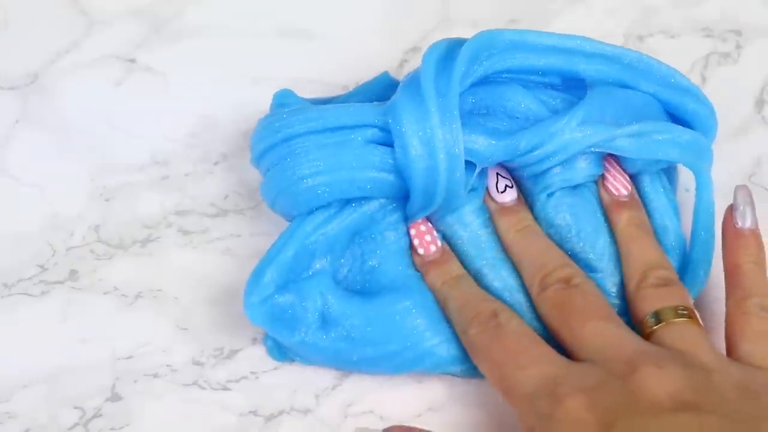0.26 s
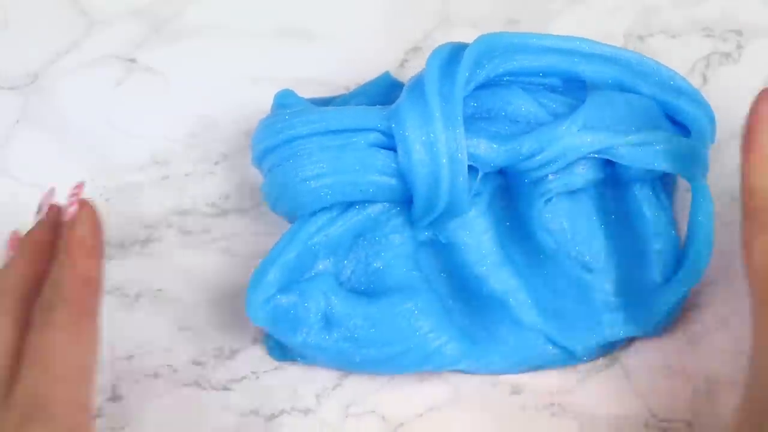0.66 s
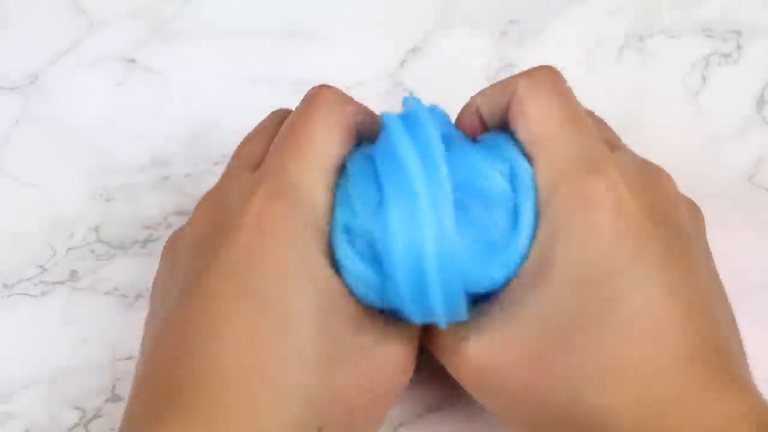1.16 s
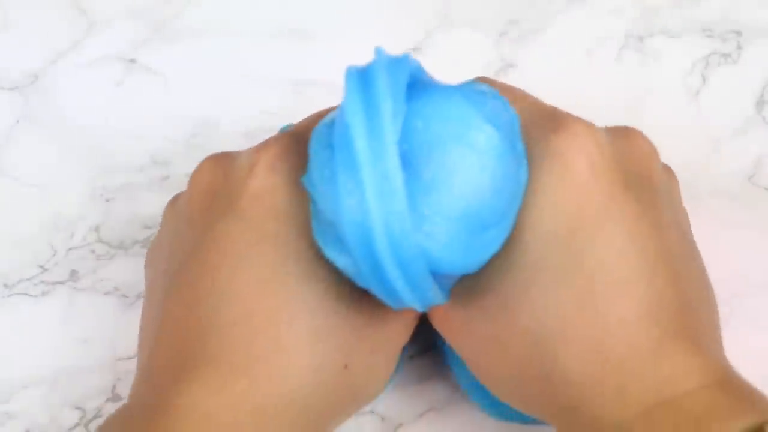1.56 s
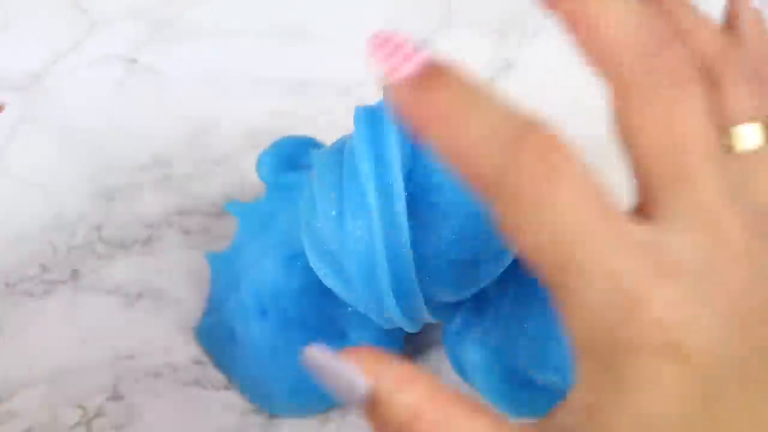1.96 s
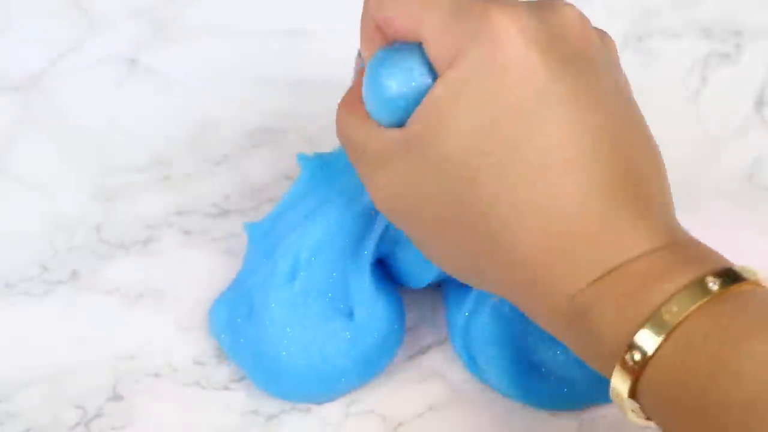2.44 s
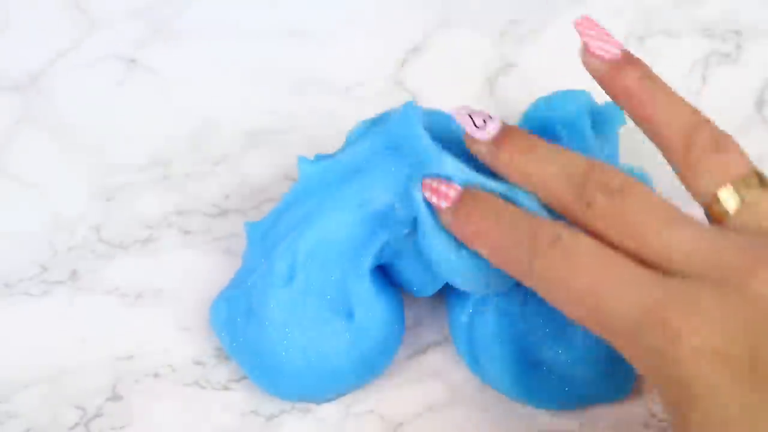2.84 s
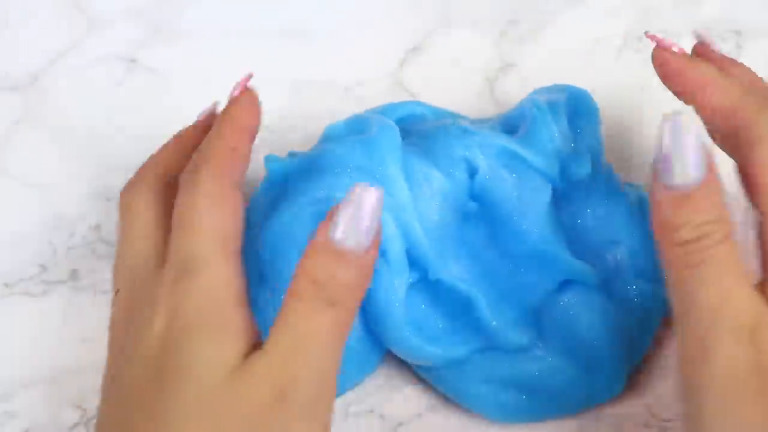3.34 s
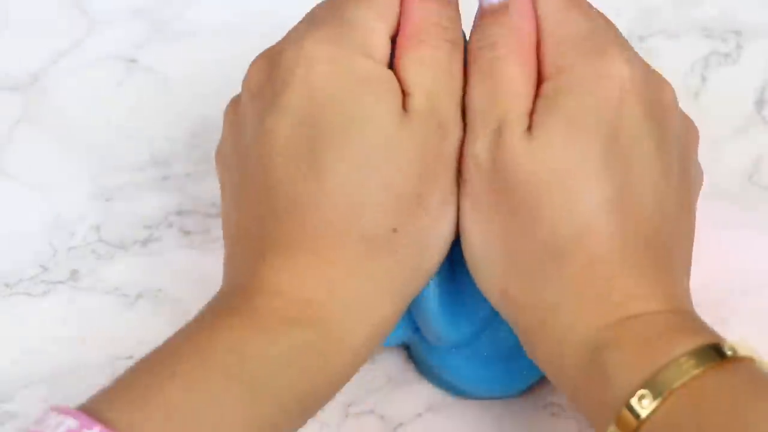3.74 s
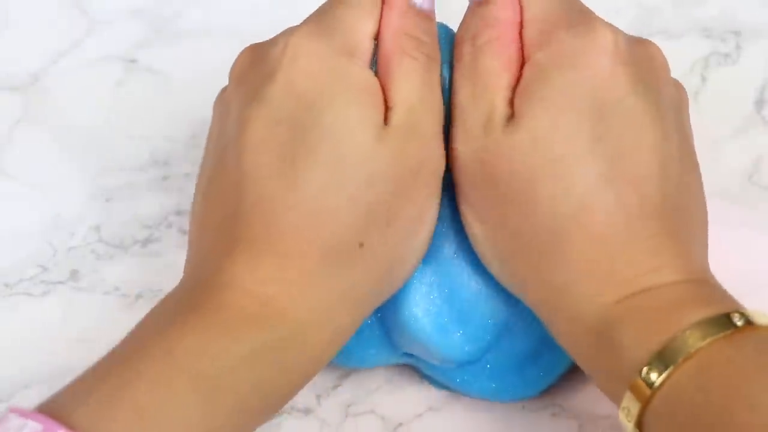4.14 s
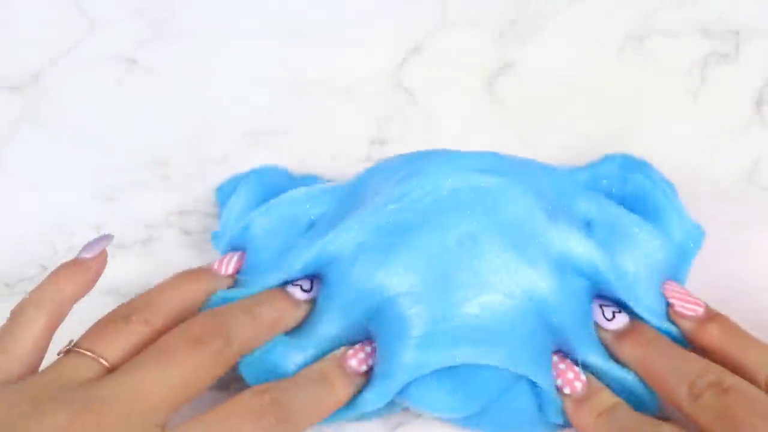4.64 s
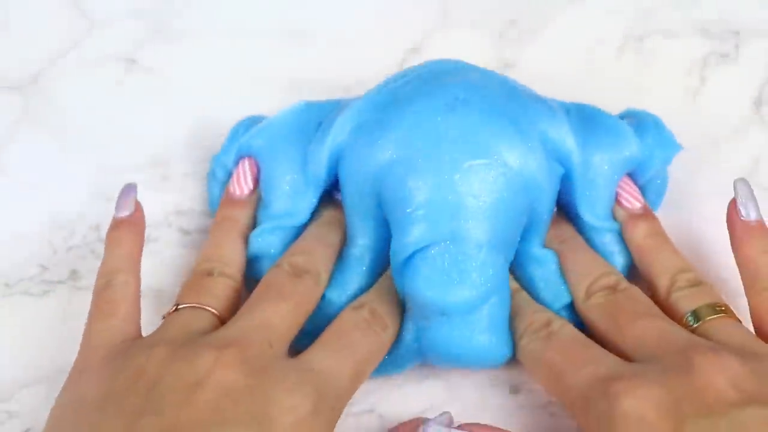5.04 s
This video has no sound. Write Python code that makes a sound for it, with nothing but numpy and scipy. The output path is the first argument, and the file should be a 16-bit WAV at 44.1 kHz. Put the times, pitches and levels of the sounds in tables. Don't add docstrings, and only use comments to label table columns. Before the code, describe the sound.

Trapped air in thick slime bursts as hard, bright snaps and hollow lower gulps, over sticky peeling crackle, short gurgles and faint squeaky whistles. Activity peaks between one and two seconds and again just before four, with quiet gaps between. Soft low booms come from the table under the hands. Heard very close and centred in a small, lightly reverberant room with low hiss; faint camera motor ticks close it.

```python
import sys
import numpy as np
from scipy import signal
from scipy.fft import rfft, irfft, next_fast_len
from scipy.io import wavfile
from scipy.ndimage import uniform_filter1d, map_coordinates

SR = 44100
rng = np.random.default_rng(int(sys.argv[2]) if len(sys.argv) > 2 else 0)


def level_to_linear(level):
    exponent = np.asarray(level, float) / 20
    return 10 ** exponent


def digitize_waveform(pressure):
    field = np.atleast_2d(pressure).T
    bounded = np.clip(field, -1, 1)
    quanta = np.round(bounded * 32767).astype(np.int16)
    wavfile.write(sys.argv[1], SR, quanta)


N = 233597

TOP_HZ, QUIET_TOP_HZ = 16700, 15900

# pitch_hz, density_db [dB per Hz]
HISS_SPECTRUM = [(15, -27), (25, -15.5), (80, 2), (226, -12), (634, -13), (746, -16), (1390, -16.5),
                 (1730, -24), (3600, -28.5), (4020, -22), (5570, -29), (15200, -24.5), (16500, -36)]
HISS_DB = -65.5
# pitch_hz, level_db
GRIT_SPECTRUM = [(100, -44), (1000, -43), (2500, -34), (6000, -30), (15000, -27)]

# pitch_hz, width_hz, level_db
LENS_BARREL = [(1580, 450, -2), (2600, 490, 0.5), (3550, 240, 4.5)]
FRAME_S, LENS_LAST_S, LENS_STEPS = 1 / 29.97, 5.2715, 14

# delay_s, level_db
ECHOES = [
    (0.0104, -13.5),
    (0.012, -22.5),
    (.0145, -26),
]
# pitch_hz, t60_s
ROOM_DECAY = [(500, 0.36), (6000, 0.26), (14000, 0.23)]

# pitch_hz, width_hz, level_db
TABLE_MODES = [(130.4, 67.7, -4.5), (162, 53, -0.5), (228.3, 14, -4.5), (294.4, 15, -5.5)]
# start_s, level_db, pitch_hz, decay_cycles [to 1/e]
KNOCKS = [
    (.468, -21.5, 143.3, 3.7),
    (2.814, -41, 151, 3.2),
    (3.413, -29.5, 161, 1.3),
    (4.003, -31, 130, 0.51),
]
# peak_s, boom_db, length_s, rumble_db [re boom]
PUSHES = [(0.451, -36, 0.061, -16), (0.853, -49, 0.017, -6), (0.99, -39.5, 0.0066, -14.5),
          (1.072, -38.5, 0.053, -22), (1.328, -47.5, 0.0093, -19.5), (1.467, -55, 0.057, -25),
          (1.769, -37.5, 0.077, -11.5), (2.296, -66, 0.041, 0), (2.713, -47, 0.025, -7),
          (2.82, -59.5, 0.071, 1), (3.245, -42, 0.047, -14), (3.435, -53.5, 0.03, 6.5),
          (3.537, -49.5, 0.064, -14), (3.66, -53, 0.034, -14), (3.792, -64, 0.094, -1),
          (4.284, -49.5, 0.15, -7), (4.654, -81, 0.045, -6), (4.888, -65, 0.087, -16)]
PUSH_RISE, PUSH_SAG_DB = 1500, 4.5
BOOM_FALL, RUMBLE_FALL = 190, 110
BOOM_REST_DB, RUMBLE_REST_DB = -64, -81.5

# start_s, end_s, start_hz, end_hz, level_db
GURGLES = [(2.694, 2.712, 656, 757, -41.5), (2.716, 2.74, 640, 817, -38.5),
           (2.738, 2.768, 1250, 900, -40.5), (2.745, 2.77, 600, 670, -44.5),
           (2.705, 2.73, 4000, 3300, -37.5), (2.712, 2.73, 3700, 2350, -51),
           (2.785, 2.835, 3800, 3800, -45.5), (2.85, 2.866, 850, 820, -48), (4.243, 4.265, 370, 260, -42.5),
           (4.266, 4.279, 4000, 2800, -42), (4.279, 4.292, 4400, 2800, -41.5),
           (4.288, 4.31, 632, 900, -44.5), (4.305, 4.32, 1700, 1600, -44), (4.335, 4.36, 1100, 1700, -43),
           (4.362, 4.386, 1000, 1000, -45), (4.39, 4.41, 980, 540, -48), (4.414, 4.432, 820, 770, -53),
           (4.33, 4.445, 270, 330, -51.5), (1.3, 1.318, 1800, 1400, -38), (1.325, 1.36, 1500, 1600, -40.5),
           (3.8012, 3.8055, 1350, 1100, -20.5), (3.811, 3.82, 1500, 1400, -29),
           (3.824, 3.831, 1400, 1600, -33), (1.757, 1.778, 3300, 3600, -31),
           (1.788, 1.817, 3000, 2900, -31), (1.762, 1.785, 2000, 1500, -31), (1.838, 1.858, 650, 600, -35),
           (1.71, 1.732, 1300, 1200, -45), (3.7935, 3.799, 3800, 3400, -31), (3.225, 3.28, 500, 450, -45),
           (.912, .925, 2300, 1900, -46.5), (.85, .862, 1900, 1400, -47.5), (1.04, 1.075, 510, 700, -49),
           (.44, .5, 450, 580, -40.5)]
# start_s, end_s, start_hz, end_hz, level_db
WHISTLES = [(1.863, 1.883, 8700, 5900, -39), (1.877, 1.89, 5700, 4980, -47),
            (2.272, 2.288, 2510, 2500, -58), (2.288, 2.3, 2550, 2480, -54), (2.304, 2.322, 2500, 2450, -60),
            (2.324, 2.33, 2720, 2600, -54), (2.3336, 2.3348, 3400, 3070, -14.5),
            (.945, 0.973, 4760, 4470, -50), (2.8684, 2.873, 4000, 3910, -27),
            (2.867, 2.873, 3350, 3450, -34), (2.856, 2.872, 3760, 3950, -40),
            (2.875, 2.885, 4000, 4640, -38.5), (2.888, 2.9, 4500, 4700, -47),
            (3.181, 3.207, 2900, 2960, -60)]

# peak_s, crackle_db, length_s, squelch_db [re crackle], fizz_db [re crackle]
PEELS = [(0.449, -31.5, .015, -4.5, 1), (0.442, -50, .006, 10, -7), (0.463, -27.5, 0.015, -7, -6.5),
         (0.481, -43, 0.013, 3.5, -1), (1.05, -42, 0.03, 1, -6.5), (1.072, -41.5, 0.1, 0, -12.5),
         (1.212, -48, 0.015, -2.5, -10.5), (1.7342, -34, 0.014, 2.5, 0.5), (1.757, -28, 0.083, -3.5, -9.5),
         (1.854, -46, .04, -16, -4), (2.254, -53, 0.015, -3, -0.5), (2.265, -59, 0.06, 3, -8.5),
         (2.699, -42.5, 0.077, -4, 1), (2.774, -47, 0.08, -9, -1), (2.862, -41, 0.015, 1, -7),
         (3.182, -54.5, 0.045, -13, -1.5), (3.222, -44.5, 0.0066, -4.5, 0.5), (3.235, -39.5, .016, -1, 0),
         (3.252, -36.5, .007, -5, 0), (3.263, -40, 0.0089, -0.5, -3), (3.299, -49.5, .006, -4.5, -6),
         (3.806, -53.5, 0.16, -9, 6), (4.028, -53.5, 0.039, -1.5, 13.5), (4.22, -60, .025, 1, 3.5),
         (4.244, -47.5, 0.026, -6.5, 1.5), (4.269, -38.5, 0.042, -4.5, -2), (4.323, -44, 0.094, -3.5, -1),
         (4.438, -59.5, 0.02, -8, 4.5), (4.466, -51, 0.0073, -2.5, 0)]
PEEL_RISE, PEEL_SAG_DB, PEEL_FALL = 2300, 5.5, 740
CREEP_DB, CREEP_RISE = -7.5, 760
# time_s, effort_db
KNEADING = [(0, -82.5), (.72, -69), (.83, -54.5), (.95, -48.5), (1.19, -58), (1.31, -53.5), (1.5, -62),
            (1.66, -74), (2.2, -76), (2.4, -60), (2.6, -73), (3.1, -72.5), (3.47, -56), (4.0, -60),
            (4.2, -69), (4.47, -61.5), (4.91, -62.5), (5.03, -75.5)]
KNEAD_SQUELCH_DB, KNEAD_FIZZ_DB = -6, -2
# pitch_hz, density_db [dB per Hz]
FIZZ_SPECTRUM = [(2650, -22.5), (4500, -1.5), (7880, 0), (9480, -2), (13900, -5), (16000, -9), (16200, -17),
                 (16500, -45)]

# start_s, blast_db, centre_hz, blast_s, hiss_db [re blast], hiss_s
JETS = [
    (4.0015, 0.5, 10400, 0.00072, -28.5, 0.032),
    (3.8384, -19.5, 5100, 0.00083, -18.5, 0.012),
]

# pitch_hz, width_hz
PORT = (3720, 1580)
# start_s, snap_db, ring_hz, spit_db [re snap]
SNAPS = [(0.0514, -39.5, 2750, 2), (.729, -17.5, 3540, -4.5), (0.732, -22, 2920, -8.5),
         (.765, -16.5, 3400, -4), (0.7673, -17, 4330, -13.5), (.91, -33, 2350, -6.5),
         (1.0787, -22, 3000, -8), (1.121, -4.5, 3700, 3.5), (1.2688, -3, 3293, 0.5),
         (1.4173, -24.5, 3670, 3), (1.428, -30.5, 2700, 3), (1.4598, -13.5, 3800, 2.5),
         (1.5077, -32.5, 2460, -1.5), (1.7614, -25, 3300, -4), (1.813, -31, 3080, -7),
         (1.8276, -17, 3350, 6), (2.3337, -14, 3527, -3.5), (2.3372, -27, 3620, 1),
         (2.3479, -29.5, 4400, 2.5), (2.3609, -35, 4600, 1.5), (2.717, -27, 3730, -5),
         (2.8525, -27, 3900, -9), (2.8596, -31, 3840, -3), (2.8682, -27, 4200, -7),
         (2.8806, -32.5, 3800, -2), (3.6513, -30, 3514, -2.5), (3.7249, -25.5, 2220, 4.5),
         (3.77, -16, 3250, -9.5), (3.792, -5, 3330, -10), (3.7998, -9, 3440, -1.5),
         (3.802, -15.5, 3830, 1.5), (3.8102, -20, 3700, 0.5), (3.838, -7.5, 3450, 12),
         (3.9291, -12.5, 3100, -0.5), (4.0288, -31, 3600, 11.5), (4.2835, -27, 3300, -8),
         (4.2855, -31, 4480, -6), (1.2328, -36, 2700, -8), (1.2125, -38, 3300, -5), (.4422, -30, 3000, 0)]
# start_s, cavity_db, cavity_hz, spit_db [re cavity]
GULPS = [(0.8485, -34.5, 1080, 7), (1.249, -40, 1840, -6), (1.321, -18, 1570, -6.5),
         (1.3716, -28, 1860, -3), (1.3722, -36, 500, -20), (1.321, -30, 500, -20), (1.335, -33, 1650, -20),
         (1.3927, -55, 1334, 5), (1.494, -33, 1264, -9.5), (1.7335, -18.5, 920, -1),
         (1.7401, -16.5, 1120, -2), (1.7542, -16.5, 940, -6), (1.772, -12, 1090, 2),
         (2.233, -44, 1374, -21), (2.4544, -53.5, 1916, 11), (2.551, -46.5, 1280, 6.5),
         (2.8523, -37, 898, -2), (3.8014, -24, 1410, -1), (3.8072, -17.5, 1400, -10),
         (4.065, -44, 800, -10), (4.112, -42, 2130, -10), (1.839, -31, 790, -5), (2.739, -29, 1140, -9),
         (2.88, -36.5, 1190, -2), (4.283, -26.5, 1010, -2.5), (4.326, -26, 1740, -11.5),
         (4.3963, -34.5, 1010, 11.5), (4.4692, -40.5, 1850, 16), (4.5079, -44, 1830, 19),
         (4.5666, -57, 520, 24), (4.6203, -41.5, 640, 15.5), (4.726, -47.5, 960, 0), (4.736, -56, 1020, -6)]
# start_s, spit_db, spit_hz
FILMS = [(1.2125, -28.5, 10630), (1.2323, -30.5, 12500), (1.283, 2, 15260), (1.288, -22, 8970),
         (1.7335, -11, 8500), (3.8482, -13, 10970), (1.3387, -10.5, 7500), (4.362, -33, 11000),
         (.889, -36, 10050), (1.3383, -10.5, 13950), (1.5336, -31, 8500), (1.6144, -43, 8820),
         (1.8499, -14.5, 6960), (2.1558, -25, 4250), (2.155, -27, 13000), (2.468, -39, 11800),
         (2.496, -39, 13800), (2.502, -33.5, 9550), (3.1022, -36, 12960), (3.13, -36.5, 13000),
         (3.6803, -20.5, 13320), (3.709, -22, 10520), (3.7791, -1, 11620), (3.7893, -17, 8500),
         (1.0784, -30, 9000), (3.7917, -9, 11490), (4.0015, 1, 11690), (4.0118, -2, 9500),
         (4.016, -6, 9570), (4.032, -22, 9320), (4.038, -19.5, 6970), (4.6423, -29.5, 11200),
         (4.652, -32, 6000), (4.687, -41, 11020), (4.751, -34, 9180), (4.962, -47, 6520),
         (5.005, -51, 7000), (1.4912, -27, 6000), (0.8486, -34.5, 4980), (0.9098, -38.5, 7030),
         (4.902, -42, 8000), (4.875, -37, 8500)]
# start_s, snap_db
TICKS = [(0.2104, -51), (0.487, -31), (0.817, -40), (0.8873, -53), (0.9424, -47), (1.119, -34),
         (1.2599, -40), (1.4244, -38), (1.572, -50), (2.4, -44), (2.4788, -48), (2.492, -54), (2.5088, -42),
         (2.5194, -53), (2.6405, -56), (2.7601, -34.5), (3.18, -46.5), (2.293, -51), (3.4687, -37.5),
         (3.5077, -47), (3.531, -37.5), (3.628, -50), (3.97, -38), (4.246, -38), (4.347, -39),
         (4.4164, -43), (4.679, -50.5), (4.7066, -58.5), (4.7678, -56.5), (4.802, -48), (4.822, -50),
         (4.853, -49), (4.8747, -46), (4.884, -52), (4.909, -54), (5.044, -53), (1.0252, -42), (4.992, -56),
         (5.083, -55.5), (4.767, -52)]
# start_s, level_db, pitch_hz
THUDS = [(1.121, -15.5, 1195), (1.2687, -10, 1220), (1.4596, -20.5, 1070), (2.3337, -12, 1050),
         (3.77, -15, 1300), (3.779, -14.5, 1116), (3.792, -8, 1149), (3.7983, -15, 1212),
         (3.8389, -17.5, 1200), (3.9291, -11, 1200), (4.0014, -15, 1200), (4.0279, -30, 1200),
         (1.7333, -20, 1500), (4.25, -35, 400)]
# start_s, level_db, pitch_hz, decay_cycles [to 1/e]
CAVE_IN = (3.7919, 2.2, 1316, .6)
SMALL_CAVITY_DB, GULP_SNAP_DB, FILM_SNAP_DB, FILM_CAVITY_DB, TICK_SPIT_DB = -16, -6, -14.5, -6.5, -1
POCKET_HZ = 3540
SPIT_HZ, GULP_SPIT_HZ, SPIT_OCTAVE_DB = 6000, 7500, 20.5


def unit(x):
    return x / np.sqrt(np.mean(x ** 2) + 1e-20)


def along(points, hz):
    f, v = np.transpose(points)
    return np.interp(np.log(hz + 1), np.log(f + 1), v)


def wobble(rate):
    knots = rng.standard_normal(int(N * rate / SR) + 4)
    return map_coordinates(knots, [np.arange(N) * rate / SR])


def filtered(x, response):
    m = next_fast_len(N + SR // 2)
    return irfft(rfft(x, m) * response(np.fft.rfftfreq(m, 1 / SR)), m)[:N]


def modes(rows):
    def response(f):
        total = 0
        for k, (centre, width, db) in enumerate(rows):
            total = total + (-1) ** k * level_to_linear(db) * 1j * f * width / (centre ** 2 - f ** 2 + 1j * f * width)
        return total
    return response


def small_source(hz, corner_hz=330):
    u = 1j * hz / corner_hz
    return u ** 3 / ((1 + u) * (1 + u + u * u))


def rings(s, gain, hz, cycles, size, swell=0.025):
    start = (s * SR).astype(int)
    t = (np.arange(size) - (s * SR - start)[:, None]).clip(0) / SR
    turns = hz[:, None] * t
    shape = (1 - np.exp(-turns / swell)) * np.exp(-turns / np.reshape(cycles, (-1, 1)))
    wave = gain[:, None] * np.sin(2 * np.pi * turns) * shape
    at = start[:, None] + np.arange(size)
    return np.bincount(at.ravel(), wave.ravel(), N + size)[:N]


def strokes(s, db, length, rise, sag_db, fall):
    t = np.arange(0, N / SR, 1 / 1000)
    age, last = t - s[:, None], length[:, None] + 1e-4
    early = (-age).clip(0)
    loss_db = np.minimum(rise * early, CREEP_RISE * early - CREEP_DB)
    loss_db += sag_db * (age / last).clip(0, 1) + fall * (age - last).clip(0)
    gain = np.sqrt(np.sum(level_to_linear(db[:, None] - loss_db) ** 2, axis=0))
    return np.interp(np.arange(N) / SR, t, gain)


def room_tone():
    noise = rng.standard_normal(N)
    return level_to_linear(HISS_DB) * unit(filtered(noise, lambda hz: level_to_linear(along(HISS_SPECTRUM, hz)) * (hz < QUIET_TOP_HZ)))


def lens():
    kicks = np.zeros(N)
    for k in range(LENS_STEPS):
        at = LENS_LAST_S - k * FRAME_S + 0.002 * np.arange(4) + rng.normal(0, 0.0001, size=4)
        step_db = -26.5 - 0.05 * k - 4.8 * (k % 2)
        pulse_db = np.array([-5.5, -3.0, -4.5, -4]) + rng.normal(0, 1.3, size=4)
        kicks[(at * SR).astype(int)] = level_to_linear(step_db + pulse_db)
    return filtered(kicks, modes(LENS_BARREL))


def room(x, tail_db):
    answer = np.zeros(SR // 2)
    for s, db in ECHOES:
        rough = rng.standard_normal(24) * np.exp(-np.arange(24) / 0.8)
        answer[round(s * SR):][:24] += level_to_linear(db) * rough / np.linalg.norm(rough)
    scatter = rng.standard_normal(200) * np.exp(-np.arange(200) / SR / 0.0018)
    answer[45:245] += level_to_linear(-12.5) * scatter / np.linalg.norm(scatter)
    wet = signal.fftconvolve(x, answer)[:N]
    for part in range(4):
        hz, t, z = signal.stft(rng.standard_normal(SR // 2), SR, nperseg=256)
        decay = level_to_linear(-60 * t / along(ROOM_DECAY, hz)[:, None])
        tail = signal.istft(z * decay, SR, nperseg=256)[1]
        tail *= 1 - np.exp(-np.arange(len(tail)) / SR / 0.0017)
        share = (np.arange(N) // 1500) % 4 == part
        wet += level_to_linear(tail_db) * signal.fftconvolve(x * share, tail / np.linalg.norm(tail))[:N]
    return wet


def table():
    s, db, length, rumble_db = np.transpose(PUSHES)
    load = strokes(s, db, length, PUSH_RISE, PUSH_SAG_DB, BOOM_FALL)
    shake = strokes(s, db + rumble_db, length, PUSH_RISE, PUSH_SAG_DB, RUMBLE_FALL)
    boom = filtered(rng.standard_normal(N), modes(TABLE_MODES))
    boom = unit(boom / np.abs(uniform_filter1d(boom ** 2, size=1600)) ** 0.21)
    rumble = unit(filtered(rng.standard_normal(N), lambda hz: (hz > 18) * (hz / 40) / (1 + (hz / 55) ** 4)))
    s, db, hz, cycles = np.transpose(KNOCKS)
    knocks = rings(s, level_to_linear(db), hz, cycles, size=8000, swell=0.79)
    return knocks + np.hypot(load, level_to_linear(BOOM_REST_DB)) * boom + np.hypot(shake, level_to_linear(RUMBLE_REST_DB)) * rumble


def gurgles():
    out, stir = np.zeros(N), wobble(900) + 1j * wobble(900) + 0.6
    for start, end, hz0, hz1, db in GURGLES:
        a, b = int(start * SR), int(end * SR)
        u = np.linspace(0, 1, b - a)
        turns = np.cumsum(hz0 + (hz1 - hz0) * u) / SR
        swell = np.sqrt(np.abs(np.sin(np.pi * u)))
        out[a:b] += level_to_linear(db - 4) * swell * np.real(stir[a:b] * np.exp(2j * np.pi * turns))
    return out


def whistles():
    out, waver = np.zeros(N), wobble(900)
    for start, end, hz0, hz1, db in WHISTLES:
        a, b = int(start * SR), int(end * SR)
        u = np.linspace(0, 1, b - a)
        turns = np.cumsum(hz0 + (hz1 - hz0) * u + 0.03 * hz0 * waver[a:b]) / SR
        out[a:b] += level_to_linear(db) * np.sin(np.pi * u) * np.sin(2 * np.pi * turns)
    return out


def grains(count, centre_hz, octaves, drift, cycles, scatter_db, size):
    u, g = rng.random((count, 2)), rng.standard_normal(count)
    at = u[:, 0] * (N - 1)
    shift = octaves * g + drift * wobble(30)[at.astype(int)]
    hz = np.clip(centre_hz * 2 ** shift, 200, 16000)
    gain = level_to_linear(-scatter_db * np.log(1 - 0.97 * u[:, 1]))
    return unit(rings(at / SR, gain, hz, cycles, size, swell=0.07))


def peel():
    s, db, length, squelch_db, fizz_db = np.transpose(PEELS)
    knead_s, knead_db = np.transpose(KNEADING)
    effort_db = np.interp(np.arange(N) / SR, knead_s, knead_db)

    def level(part_db, knead_part_db):
        pulled = strokes(s, db + part_db, length, PEEL_RISE, PEEL_SAG_DB, PEEL_FALL)
        return np.hypot(pulled, level_to_linear(effort_db + knead_part_db))

    flutter = 1.8 * wobble(80)
    squelch = grains(count=6500, centre_hz=977, octaves=0.7, drift=0.25, cycles=5.0, scatter_db=1.5, size=300)
    squelch = unit(level_to_linear(flutter + 1.3 * wobble(60) + 1.7 * wobble(20)) * squelch)
    crackle = grains(count=11000, centre_hz=3250, octaves=0.37, drift=0.19, cycles=1.6, scatter_db=2.5, size=120)
    crackle = unit(level_to_linear(flutter + 0.85 * wobble(60) + 1.3 * wobble(20)) * crackle)
    spray = (rng.random(N) < 0.25) * rng.standard_normal(N)
    fizz = filtered(spray, lambda hz: level_to_linear(along(FIZZ_SPECTRUM, hz)))
    fizz = unit(level_to_linear(flutter + 1.8 * wobble(150)) * fizz)
    wet = level(squelch_db, KNEAD_SQUELCH_DB) * squelch
    return wet + level(0, 0) * crackle + level(fizz_db, KNEAD_FIZZ_DB) * fizz


def jets():
    out, t = np.zeros(N), np.arange(N) / SR
    for s, db, hz, blast_s, hiss_db, hiss_s in JETS:
        age = (t - s).clip(0)
        air = unit(filtered(rng.standard_normal(N), modes([(hz, 0.45 * hz, 0)])))
        hiss = level_to_linear(hiss_db + 0.83 * wobble(200)) * np.exp(-age / hiss_s)
        out += level_to_linear(db) * (t > s) * (np.exp(-age / blast_s) + hiss) * air
    return out


def all_bursts():
    rows = []
    for s, db, hz, spit_db in SNAPS:
        rows.append((s, db, SMALL_CAVITY_DB, hz, spit_db, SPIT_HZ * 2 ** (spit_db / SPIT_OCTAVE_DB)))
    for s, db, hz, spit_db in GULPS:
        spit_hz = GULP_SPIT_HZ * 2 ** (spit_db / SPIT_OCTAVE_DB)
        rows.append((s, db + GULP_SNAP_DB, -GULP_SNAP_DB, hz, spit_db - GULP_SNAP_DB, spit_hz))
    for s, db, spit_hz in FILMS:
        rows.append((s, db + FILM_SNAP_DB, FILM_CAVITY_DB, 1.2 * POCKET_HZ, -FILM_SNAP_DB, spit_hz))
    for s, db in TICKS:
        ring_hz = POCKET_HZ * 2 ** rng.normal(0, 0.04)
        rows.append((s, db, SMALL_CAVITY_DB, ring_hz, TICK_SPIT_DB, SPIT_HZ * 2 ** rng.normal(0, 1.0)))
    return rows


def pops():
    s, db, cavity_db, ring_hz, spit_db, spit_hz = np.transpose(all_bursts())
    g = rng.standard_normal((len(s), 2))
    port_hz, port_width = PORT
    large = ring_hz < 2200
    cavity_hz = np.where(large, ring_hz, 1550 * 2 ** (0.15 * g[:, 0]))
    snap_hz = np.where(large, port_hz, ring_hz)
    edge_hz = 7500 * 2 ** (0.5 * g[:, 1]).clip(-0.8, 0.8)
    cavity = rings(s, level_to_linear(db + cavity_db + 1.5), cavity_hz, np.where(large, 1.4, 0.7), size=400, swell=0.032)
    snap = rings(s, level_to_linear(db + 9.5), snap_hz, port_hz / (np.pi * port_width), size=200, swell=0.077)
    spit = rings(s, level_to_linear(db + spit_db + 9.5), spit_hz, 0.62, size=100)
    edge = rings(s, level_to_linear(db + spit_db - 3.0), edge_hz, 1.0, size=40)
    s, db, hz = np.transpose(THUDS)
    thuds = rings(s, level_to_linear(db), hz, 0.41, size=400, swell=0.14)
    s, db, hz, cycles = np.reshape(CAVE_IN, (-1, 1))
    cave_in = rings(s, level_to_linear(db), hz, cycles, size=400, swell=0.19)
    snap = filtered(snap, lambda hz: small_source(hz, 1400))
    spit = filtered(spit - edge, lambda hz: small_source(hz, 2900))
    return cavity + thuds - cave_in + snap + spit


def scene():
    bursts = filtered(pops() + jets(), small_source)
    wet = peel() + gurgles() + whistles()
    crackle = filtered(wet, lambda hz: small_source(hz) * (hz < QUIET_TOP_HZ))
    walls = room(bursts + 0.5 * crackle, tail_db=-14.5)
    walls = filtered(walls, lambda hz: hz < QUIET_TOP_HZ)
    mono = bursts + crackle + walls + table() + lens() + room_tone()
    return np.array([mono, mono])


def low_pass(x):
    return signal.sosfilt(signal.butter(12, 16790, fs=SR, output="sos"), x)


def record(dry):
    mono = np.clip(dry[0], -1, 1)
    mono = filtered(mono, lambda hz: ((TOP_HZ - hz) / 600).clip(0, 1))
    grit = mono * wobble(3000) * level_to_linear(4.5 * wobble(15))
    grit = filtered(grit, lambda hz: level_to_linear(along(GRIT_SPECTRUM, hz)))
    return low_pass(np.array([mono + grit, mono - grit]))


dry = scene()
out = record(dry)
digitize_waveform(out)
```